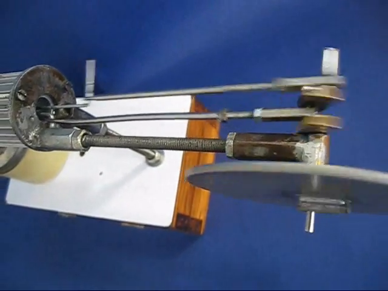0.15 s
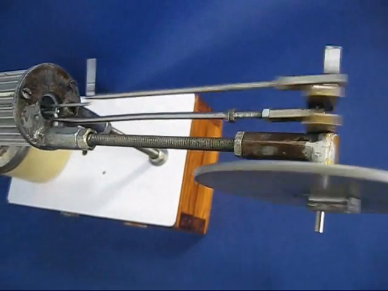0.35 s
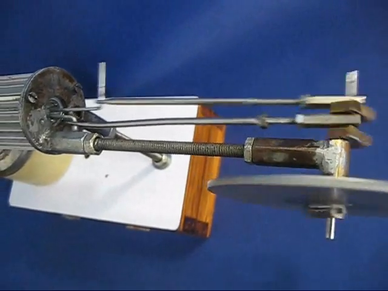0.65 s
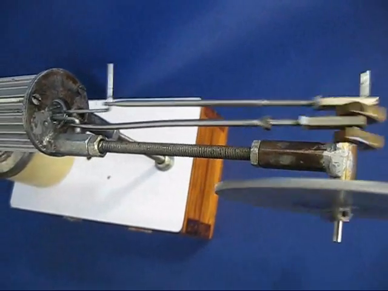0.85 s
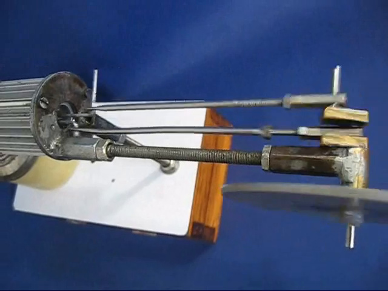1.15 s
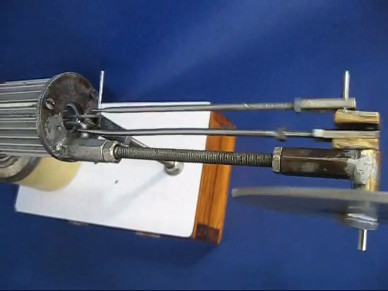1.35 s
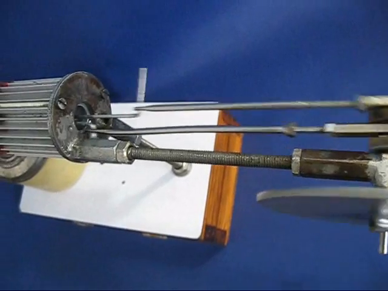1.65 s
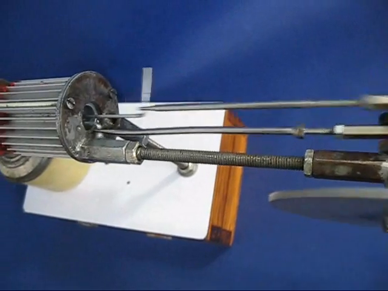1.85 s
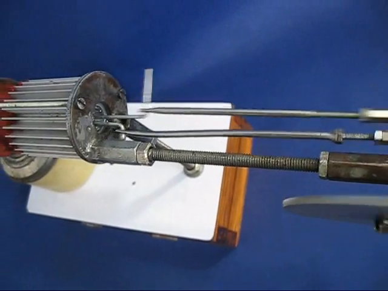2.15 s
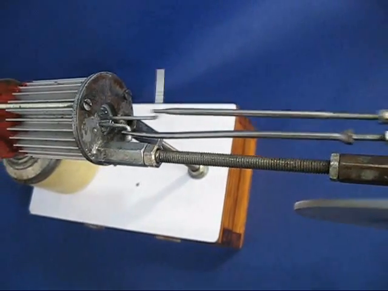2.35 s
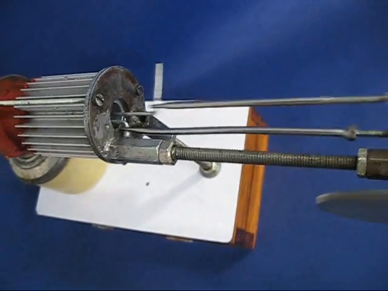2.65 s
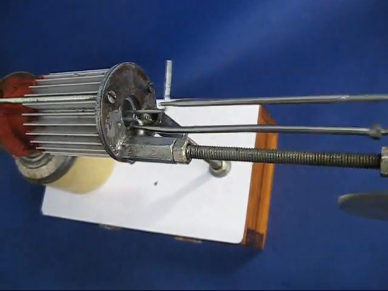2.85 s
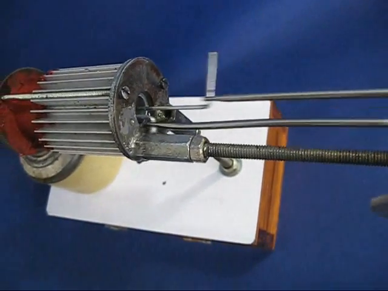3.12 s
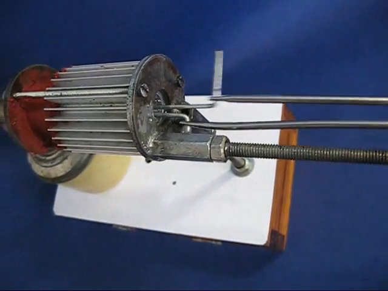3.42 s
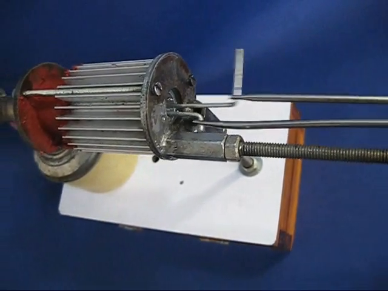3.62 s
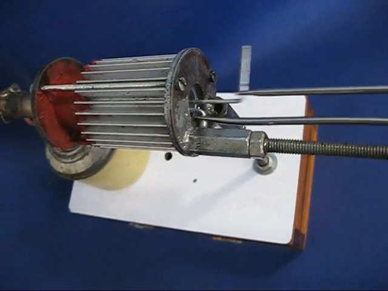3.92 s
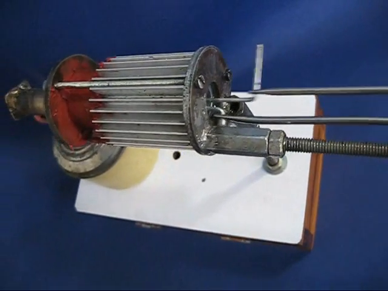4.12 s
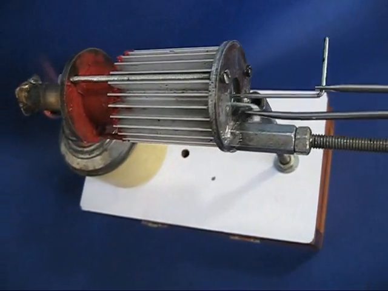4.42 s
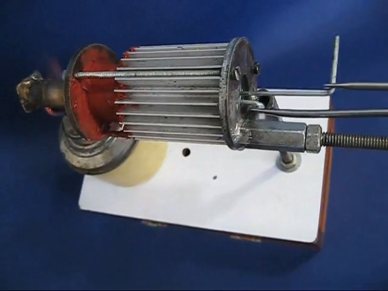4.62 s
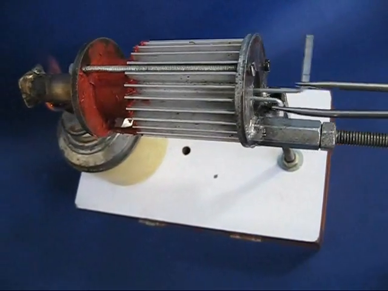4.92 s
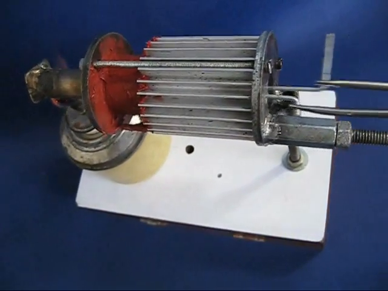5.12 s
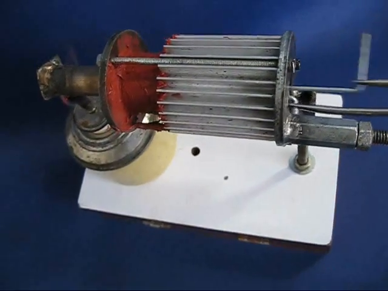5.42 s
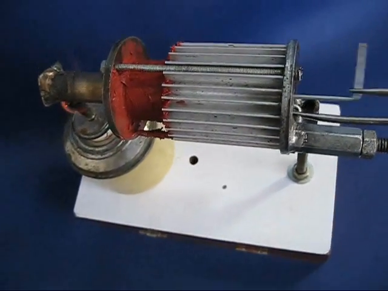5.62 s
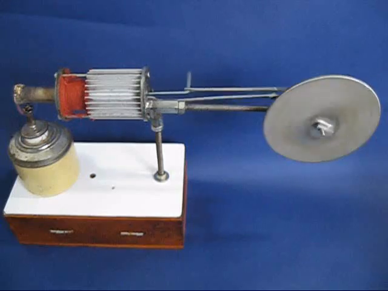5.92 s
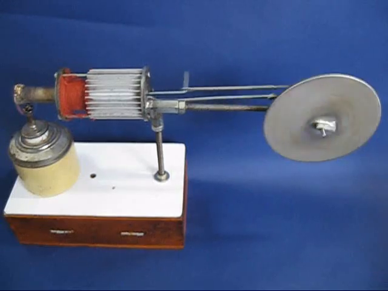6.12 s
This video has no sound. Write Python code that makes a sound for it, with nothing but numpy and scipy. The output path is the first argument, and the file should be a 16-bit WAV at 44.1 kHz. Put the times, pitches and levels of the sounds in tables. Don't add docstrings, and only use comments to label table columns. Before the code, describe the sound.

A small hot-air engine clatters steadily at nearly five turns a second, scraping metallically, its dry squeak growing louder as the microphone nears the cylinder.

```python
import sys
import numpy as np
from scipy import signal
from scipy.io import wavfile
from scipy.ndimage import uniform_filter1d

SR = 44100
rng = np.random.default_rng(int(sys.argv[2]) if len(sys.argv) > 2 else 0)


def persist_wave(psi):
    counts = np.round(np.clip(psi, -1, 1) * 32767).astype(np.int16)
    wavfile.write(sys.argv[1], SR, np.atleast_2d(counts).T)


def boost_factor(decibels):
    exponent = np.asarray(decibels, float) / 20
    return 10 ** exponent


N = 276489
HOLD = 4
RATE, M = SR / HOLD, -(-N // HOLD)
TIME = np.arange(M) / RATE


def rms_one(x):
    return x / np.sqrt(np.mean(x ** 2) + 1e-20)


def in_time(rows):
    s, *columns = np.transpose(rows)
    return [np.interp(TIME, s, column) for column in columns]


def around(angle, at, spread, level_db):
    return level_db * np.exp(-((angle - at) / spread) ** 2)


def flutter(per_s):
    r = np.exp(-2 * np.pi * per_s / RATE)
    noise = rng.standard_normal(M + 2000)
    return rms_one(signal.lfilter([1], [1, -2 * r, r * r], noise)[2000:])


def resonate(x, hz, width_hz):
    r = np.exp(-np.pi * width_hz / RATE)
    top = 2 * np.pi * min(hz, RATE / 2) / RATE
    gain = (1 - r) * abs(1 - r * np.exp(-2j * top)) / (2 * np.sin(top / 2))
    return signal.lfilter([gain, -gain], [1, -2 * r * np.cos(top), r * r], x)


def body(force, modes):
    def through(x):
        out = 0
        for k, (hz, width_hz, level_db) in enumerate(modes):
            out = out + (-1) ** k * boost_factor(level_db) * resonate(x, hz, width_hz)
        return out

    click = np.arange(4096) == 0
    return through(force) / np.sqrt(np.sum(through(click) ** 2))


FIRST_TURN_S, TURN_S, QUICKER_S_PER_TURN, TURN_COUNT = -.101, .21226, .000076, 30


def turn_starts():
    k = np.arange(TURN_COUNT)
    return FIRST_TURN_S + TURN_S * k - QUICKER_S_PER_TURN * k ** 2 / 2


def crank():
    turned = np.interp(TIME, turn_starts(), np.arange(TURN_COUNT))
    return turned.astype(int), turned % 1


def once_a_turn(angle, level_db):
    starts_s = turn_starts()
    luck = rng.standard_normal((len(starts_s), 2))
    at = ((starts_s + angle * TURN_S + .0005 * luck[:, 0]) * RATE).astype(int)
    inside = (at >= 0) & (at < M)
    blows = np.full(M, 1e-12)
    blows[at[inside]] = boost_factor(0.45 * luck[inside, 1])
    return blows * boost_factor(level_db)


# time_s, facing_fins [0-1], facing_end_plate [0-1]
MIC_GLIDE = [
    (0, 0.32, 0.28),
    (1.6, 0.19, 0.04),
    (2.2, 0.38, 0.03),
    (2.9, 0.57, 0.22),
    (3.4, 0.82, 0.87),
    (4.1, 0.9, 0.94),
    (4.6, 0.93, 0.98),
    (5.3, 1, 0.7),
    (5.9, 0.83, 0.34),
]
PART_LEVELS = {"piston": (-40, 19.7, 0.1), "rods": (-37, 0.081, 5), "guides": (-33.5, -8, 11.1),
               "link": (-41.5, -4.5, 6), "frame": (-51, .1, 2.7), "pin": (-51, 3.6, 5),
               "knock": (-31, -10, 5.9), "front joints": (-36.5, -4, 6.7), "back joints": (-35, 5, .1),
               "hiss": (-50, 4, .1), "box top": (-44.5, 1.5, 5.5)}


def heard(part):
    fins, plate = in_time(MIC_GLIDE)
    far_db, fins_db, plate_db = PART_LEVELS[part]
    return far_db + fins_db * fins + plate_db * plate


def hiss():
    return boost_factor(heard("hiss")) * rng.standard_normal(M)


# time_s, level_db, lean_to_deep_modes_db
BOX_SHAKING = [(0, -37.5, 1), (.5, -38.5, 0), (.95, -35, 2), (1.3, -38.5, -2), (1.65, -34.5, 0),
               (1.9, -36, -1.5), (2.25, -39.5, -3), (2.5, -35, -5), (2.9, -38, -0.5), (3.15, -37, 2),
               (3.5, -33.5, -2), (3.8, -36.5, -1), (4.2, -30.5, -1), (4.6, -35, -3.5), (4.95, -35, 0.5),
               (5.35, -32, 2.5), (5.6, -33, 1), (5.85, -35, -2.5)]
# pitch_hz, width_hz, level_db
DEEP_MODES = [(38, 15, -8.5), (53, 7.1, 0), (77, 13, -2.5)]
PANEL_MODES = [(112.4, 13, -1.5), (137, 24.5, -7.5)]
TOP_MODES = [(164.6, 22.3, 3.5), (227, 180, -7), (296.5, 9.5, 3), (333.3, 510, -18.5)]


def box():
    deep_db, panel_db, wander_db, wander_per_s = -4, -2.5, 1.55, 6
    shake_db, lean_db = in_time(BOX_SHAKING)
    thump_db = around(crank()[1], at=.4, spread=0.082, level_db=5.8)
    thump_db = thump_db * (1 - 0.91 * in_time(MIC_GLIDE)[0])
    groups = [(shake_db + deep_db + lean_db, DEEP_MODES),
              (shake_db + panel_db - lean_db, PANEL_MODES),
              (heard("box top"), TOP_MODES)]
    out = 0
    for level_db, modes in groups:
        hum = body(rng.standard_normal(M), modes)
        loudness = uniform_filter1d(hum ** 2, size=500) + 0.067
        steady = rms_one(hum / loudness ** 0.33)
        out = out + boost_factor(thump_db + level_db + wander_db * flutter(wander_per_s)) * steady
    return out


# start_s, peak_db, pitch_hz
STRAY_TAPS = [
    (4.0021, -6, 1450),
    (4.0040, -13, 1950),
    (4.0150, -19, 1750),
]


def taps():
    rise_s, decay_s = .0003, .0009
    out = np.zeros(M)
    for start_s, peak_db, pitch_hz in STRAY_TAPS:
        since = np.maximum(TIME - start_s, 0)
        envelope = np.exp(-since / decay_s) * (1 - np.exp(-since / rise_s))
        out += boost_factor(peak_db + 6) * np.sin(2 * np.pi * pitch_hz * since) * envelope
    since = TIME - STRAY_TAPS[0][0]
    wash = boost_factor(-30.5 - 90 * np.maximum(since, 0)) * (since > 0) * rng.standard_normal(M)
    return out + body(wash, [(1200, 720, 0)])


# crank_angle [0-1], pitch_hz, width_hz, push_ms
FRAME_KNOCK = (0.79, 810, 31.5, 7.2)


def knock():
    angle, pitch_hz, width_hz, push_ms = FRAME_KNOCK
    blows = once_a_turn(angle, heard("knock"))
    since = np.arange(400) / RATE
    envelope = np.exp(-np.pi * width_hz * since) * (1 - np.exp(-1000 * since / push_ms))
    ring = np.sin(2 * np.pi * pitch_hz * since) * envelope
    return 1.6 * np.convolve(blows, ring)[:M]


# crank_angle [0-1], level_db, pitch_hz, width_hz, rattle_ms
SLACK_JOINTS = [
    (.002, 0.5, 4630, 1490, 3.3),
    (.004, 8.5, 806, 504, 3.2),
    (.004, 13, 2800, 1510, 2.8),
    (0.378, -4, 1200, 120, 4.1),
    (.478, 3, 4660, 1200, 10),
    (0.476, 7, 2900, 910, 4),
    (0.831, -1, 2750, 300, 2.9),
    (0.927, -11, 3800, 699, 2.28),
    (0.923, -10, 2830, 700, 2.3),
]


def joints():
    return_angle = .45
    out = np.zeros(M)
    for angle, level_db, pitch_hz, width_hz, rattle_ms in SLACK_JOINTS:
        side = "front joints" if angle < return_angle else "back joints"
        blows = once_a_turn(angle, heard(side) + level_db)
        dying = signal.lfilter([1], [1, -np.exp(-1000 / (rattle_ms * RATE))], blows)
        rattle = dying * rng.choice([-1, 1], M)
        out += body(0.31 * blows + 0.69 * rattle, [(pitch_hz, width_hz, 0)])
    return out


# start_s, peak_db, pitch_hz
PISTON_CATCHES = [(3.3278, -16, 3760), (3.3453, -10, 4045), (3.4092, -7.5, 3610), (3.456, -15, 3650),
                  (3.5493, -13, 3820), (3.6002, -18, 3590), (3.6237, -24, 3960), (3.7588, -18, 4040),
                  (3.779, -10.5, 4060), (3.8157, -24, 3700), (3.9645, -7, 3980), (4.0344, -17, 4120),
                  (4.1615, -29, 4150), (4.2438, -8.5, 3920), (4.346, -16, 4040), (4.3873, -13, 3890),
                  (4.5521, -12.5, 3880), (4.5895, -11, 3880), (4.803, -10, 3950), (4.8954, -12, 3870),
                  (5.0038, -8.5, 3950), (5.0985, -10, 3890), (5.2162, -28, 3870), (5.2964, -15.5, 3890),
                  (5.436, -19.5, 3950), (5.5029, -14, 3950), (5.6372, -17, 4000), (5.6564, -15, 4000),
                  (5.7311, -12, 3890), (5.8671, -6.5, 3880)]


def catches():
    out = np.zeros(M + 200)
    since = np.arange(200) / RATE
    swell = (1 - np.exp(-since / .002)) ** 2 * np.exp(-since / .004)
    phases = rng.random(len(PISTON_CATCHES))
    for (start_s, peak_db, pitch_hz), phase in zip(PISTON_CATCHES, phases):
        at = int(start_s * RATE)
        out[at:at + 200] += boost_factor(peak_db + 5.0) * swell * np.sin(2 * np.pi * (pitch_hz * since + phase))
    return out[:M]


def friction(per_s, spread_db, flutter_db):
    sizes = boost_factor(spread_db * np.minimum(rng.exponential(1, M), 3)) * rng.choice([-1, 1], M)
    caught = rng.random(M) < per_s / RATE
    return rms_one(sizes * caught * boost_factor(flutter_db * np.tanh(flutter(70))))


# start_angle, fastest_angle, end_angle [0-1], piston_db, rods_db
SLIDING_SPELLS = [
    (-.02, .29, 0.42, 0, 0.5),
    (.445, .59, 0.79, -1.5, -3),
    (.76, .82, 0.87, -8, -5.5),
    (.905, .93, 0.93, -14, -12.5),
]


def rubbing(column, power, rest_db):
    turn, angle = crank()
    luck_db = 1.96 * rng.standard_normal((TURN_COUNT, len(SLIDING_SPELLS)))
    out = boost_factor(rest_db)
    for k, row in enumerate(SLIDING_SPELLS):
        speed = np.sin(np.pi * np.interp(angle, row[:3], [0, .5, 1])).clip(0)
        out = out + boost_factor(row[column] + luck_db[turn, k]) * (speed > 1e-6) * speed ** power
    return out


# pitch_hz, width_hz, level_db
CYLINDER_MODES = [(4029, 214, 0), (3800, 430, -5), (4275, 130, -15.5)]
ROD_MODES = [(1686, 157, -6.5), (2015, 295, -9), (2550, 240, -7.5), (2800, 220, -5), (3200, 220, -2),
             (4740, 460, -12), (5030, 210, -11), (5560, 400, -14)]
GUIDE_MODES = [(3260, 47, -9.5), (3590, 86, 4), (3812, 54, -3), (4040, 95, -4.5)]
LINK_MODES = [(1944, 110, -1.5), (1765, 110, -12.5)]
FRAME_MODES = [(653, 100, -6.5), (783, 33, -0.5), (893, 51, 2)]
CRANK_MODES = [(970, 310, -4.5), (1218, 120, 8.5)]
# crank_angle [0-1], spread [0-1], level_db
FRAME_STRAIN = (0.26, 0.2, 10.8)
PIN_BEARING = (0.5, 0.16, 6)


def sliding():
    angle = crank()[1]
    piston = rubbing(column=3, power=1.02, rest_db=-22.5)
    rods = rubbing(column=4, power=0.64, rest_db=-11.5)
    frame_db = heard("frame") + around(angle, *FRAME_STRAIN)
    pin_db = heard("pin") + around(angle, *PIN_BEARING)
    cylinder = body(boost_factor(heard("piston")) * piston * friction(5500, 0.59, 2.84), CYLINDER_MODES)
    out = resonate(cylinder, 3930, 520)
    out = out + body(boost_factor(heard("rods")) * rods * friction(4500, 1.7, 0.63), ROD_MODES)
    out = out + body(boost_factor(heard("guides")) * piston * friction(4200, 0.83, 0.73), GUIDE_MODES)
    out = out + body(boost_factor(heard("link")) * rods * friction(4000, 1.5, 0.83), LINK_MODES)
    out = out + body(boost_factor(frame_db) * friction(1200, 5.2, 4.7), FRAME_MODES)
    return out + body(boost_factor(pin_db) * rods * friction(1500, 0.83, 1.0), CRANK_MODES)


def scene():
    sound = hiss() + box() + taps() + knock() + joints() + catches() + sliding()
    rounded = 0.37 * np.tanh(sound / 0.39)
    return np.repeat(rounded, HOLD)[None, :N]


def band_limit(x):
    return signal.sosfilt(signal.butter(12, 16720, fs=SR, output="sos"), x)


def record(dry):
    stop_s, remnant_end_s, fade_s, offset = 5.9155, 5.98, .004, -0.011
    t = np.arange(N) / SR
    remnant = boost_factor(-67.5 - 60 * (t - stop_s)) * (t < remnant_end_s)
    fade = np.clip((stop_s - t) / fade_s, .3, 1)
    cut = np.where(t < stop_s, dry * fade + offset, dry * remnant)
    top_cut = signal.ellip(12, .3, 80, 15800, fs=SR, output="sos")
    return band_limit(signal.sosfilt(top_cut, cut))


dry = scene()
out = record(dry)
persist_wave(out)
```